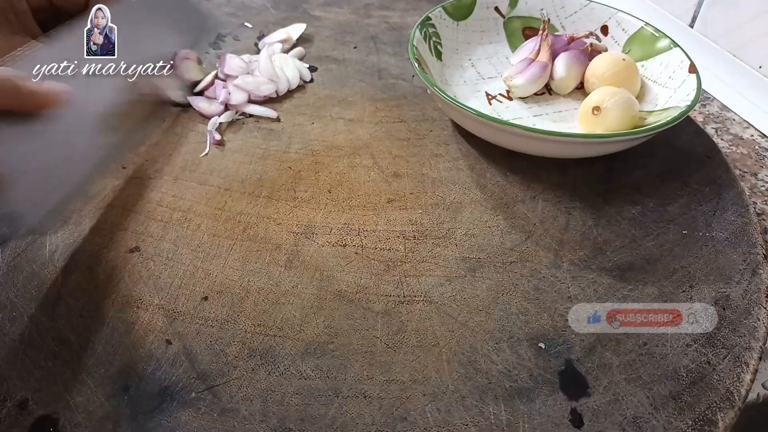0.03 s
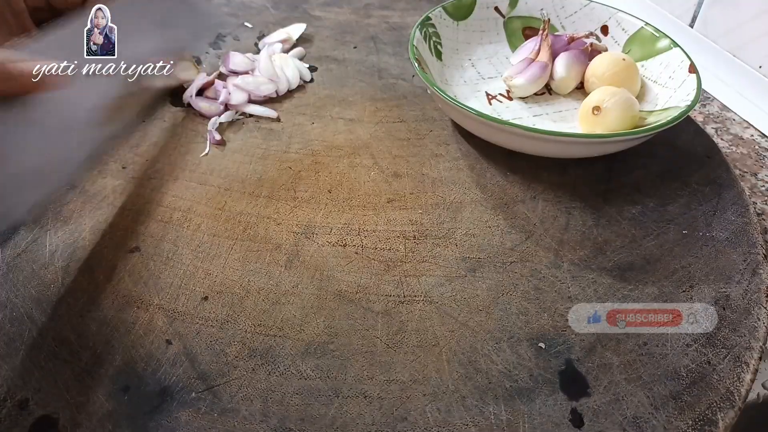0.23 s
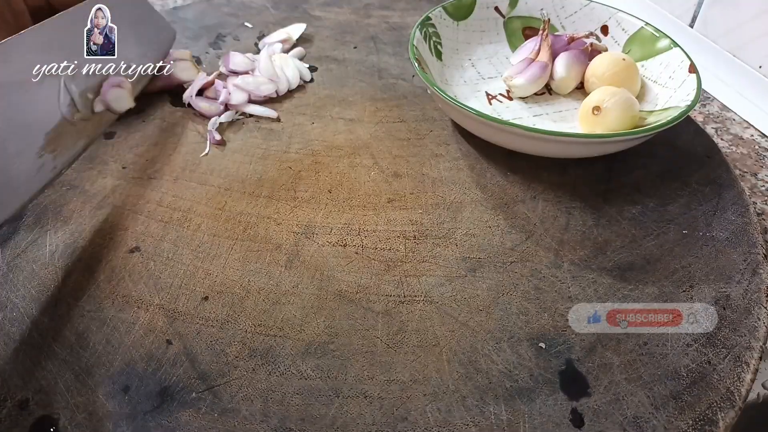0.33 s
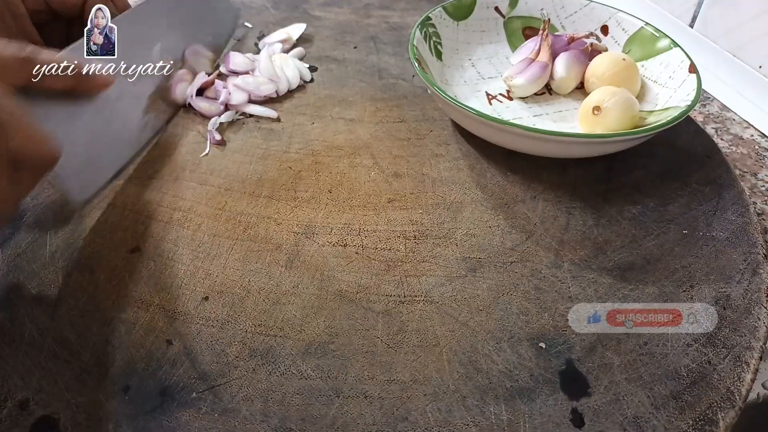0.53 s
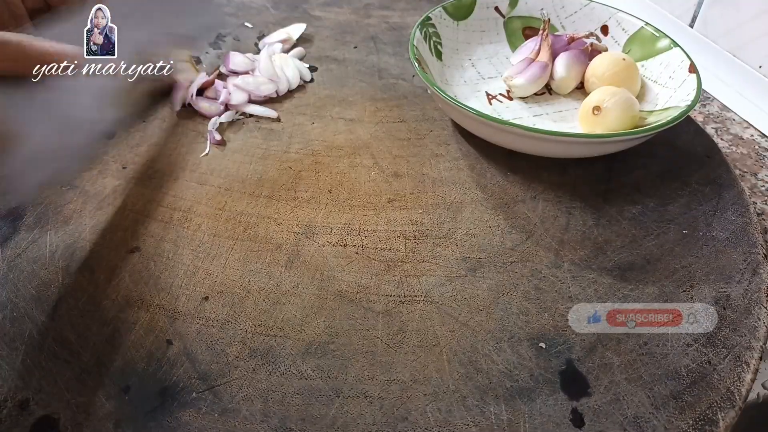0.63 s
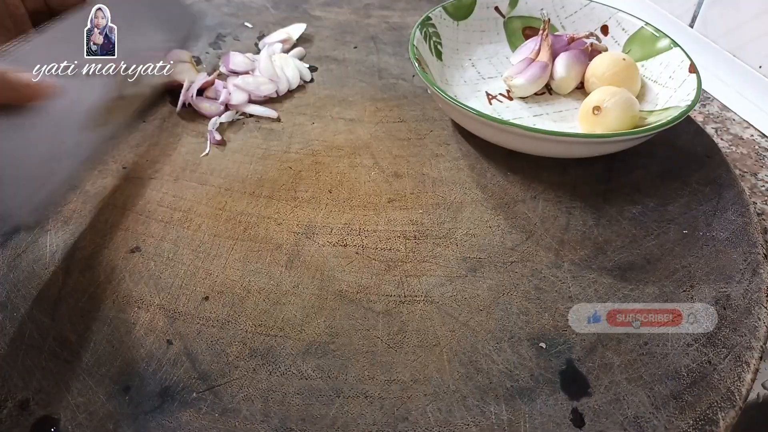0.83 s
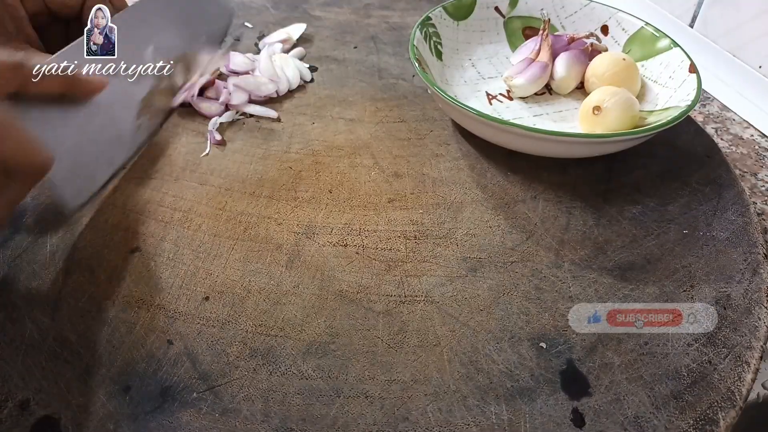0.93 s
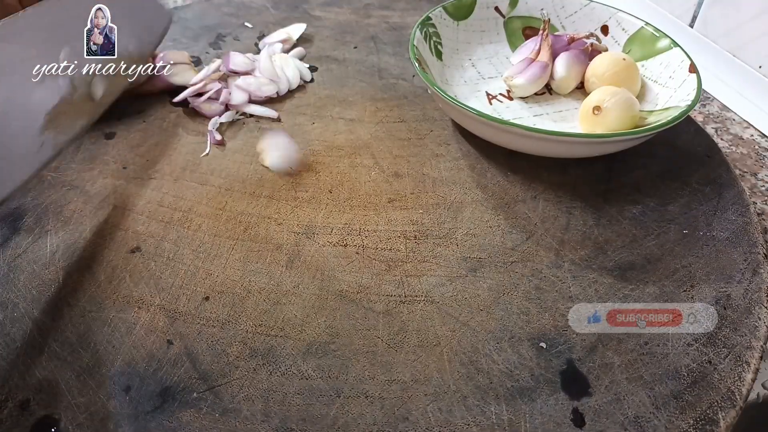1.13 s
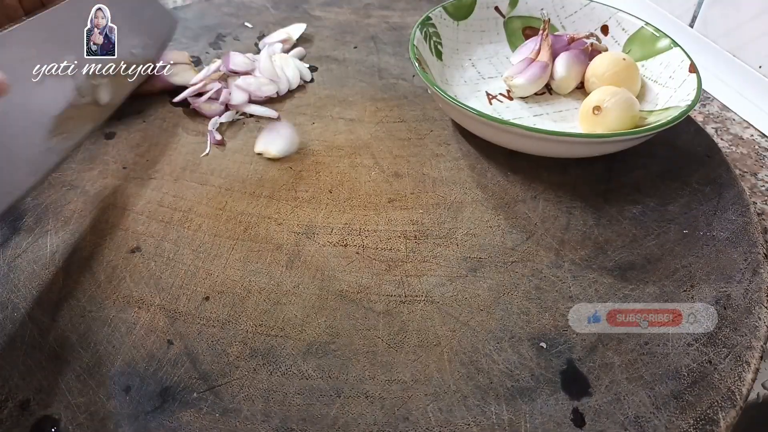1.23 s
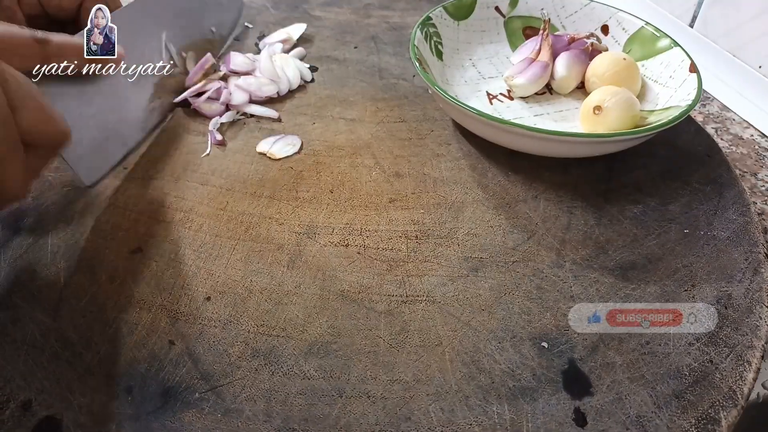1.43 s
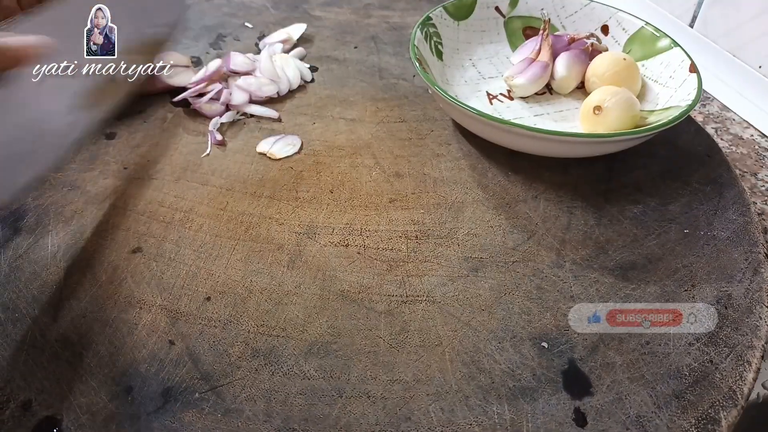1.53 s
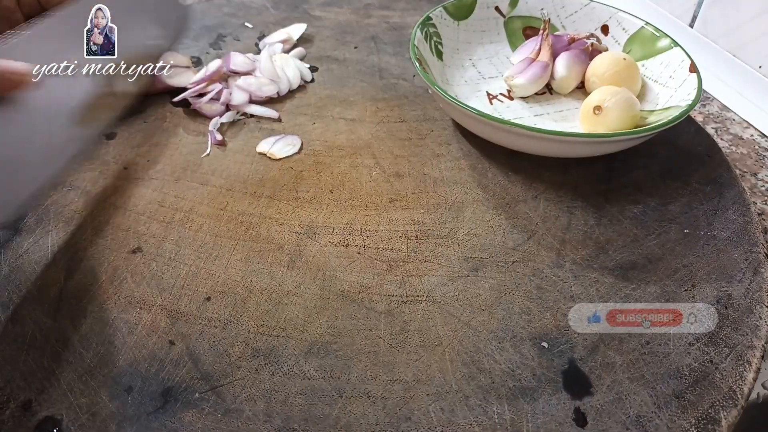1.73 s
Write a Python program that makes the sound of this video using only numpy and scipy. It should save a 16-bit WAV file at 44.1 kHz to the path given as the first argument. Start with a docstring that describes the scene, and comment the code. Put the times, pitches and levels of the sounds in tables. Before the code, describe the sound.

Four evenly paced cleaver chops cut through garlic and land on a wooden board, growing duller toward the end. Between them the steel blade tinks faintly and unsticks with tiny wet ticks, close by in a quiet, small kitchen.

```python
"""Cleaver on a chopping block

A steel cleaver slices cloves on a thick wooden block in a small kitchen, four strokes. The blade
hisses into the clove, crunches through and knocks on the wood. Between strokes it unsticks with
a wet tick and tinks faintly as it is set up again. Near walls and the room answer."""
import sys
import numpy as np
from scipy import signal
from scipy.fft import rfft, irfft, next_fast_len
from scipy.io import wavfile
from scipy.ndimage import map_coordinates

SR = 44100
rng = np.random.default_rng(int(sys.argv[2]) if len(sys.argv) > 2 else 0)


def wrap_up_sound(samples):
    """Save the sound to the file named by the first command line argument, as 16-bit audio."""
    columns = np.atleast_2d(samples).T
    # keep every value between -1 and 1, then stretch to whole-number steps
    tamed = np.clip(columns, -1, 1)
    steps = np.round(tamed * 32767).astype(np.int16)
    wavfile.write(sys.argv[1], SR, steps)


N = 79380

# room tone spectrum: (frequency [Hz], level [dB])
ROOM_TONE = [(25, -1), (60, -4), (150, -10.5), (400, -18), (1000, -22), (3500, -32.5), (8000, -37.5),
             (15500, -34)]
# early reflections off the near walls: (delay [s], level [dB])
WALL_ECHOES = [(.0061, -6.5), (0.0165, -17.5)]
# EQ on those reflections: (frequency [Hz], gain [dB])
WALL_EQ = [(200, -4.5), (900, -0.5), (1600, 5.5), (3000, -4.5), (10000, -2.5)]
# reverb decay: (frequency [Hz], T60 [s])
REVERB_DECAY = [(150, 0.25), (400, 0.2), (750, 0.2), (1050, 0.28), (1700, .24), (3500, 0.21), (7000, 0.18),
                (14000, .21)]
# EQ on the reverb send: (frequency [Hz], gain [dB])
REVERB_EQ = [(150, -15), (450, -7.5), (750, -11.5), (1000, -11), (1600, -6.5), (3000, -9), (7000, -7.5),
             (14000, -5.5)]
# the thud that block and table radiate sideways: (frequency [Hz], level [dB])
THUD_SPECTRUM = [(40, -27), (130, -26), (280, -11.5), (390, -20), (500, -4), (880, 0.5), (1150, -11.5),
                 (1270, -2.5), (1450, -4), (1750, -1), (2200, -10), (3300, -20.5), (5000, -32),
                 (16000, -48.5)]
# the blade is touched, lifted and set up again:
# (time [s], level [dB], scrape length [s], ring level [dB], high note level [dB], low-pass [Hz])
BLADE_TOUCHES = [(0.0, -50, 0.0044, -2.5, -27, 12000), (0.743, -47.5, 0.0063, 2, -21, 3960),
                 (0.7976, -39, 0.0047, -0.5, -3, 14130), (1.163, -47, 0.0059, -6, -11.5, 9300),
                 (1.2337, -47.5, 0.0079, -1.5, -3, 10000), (1.605, -51.5, 0.0091, 0.5, -17.5, 14300),
                 (1.6922, -44.5, 0.011, -3.5, 14, 15400)]
# modes of the steel blade: (frequency [Hz], level [dB])
STEEL_MODES = [(1020, -9.5), (2540, -5.5), (3400, -1.5), (3520, 3), (3930, -2), (4510, -6), (6050, -8),
               (6850, -10.5), (7350, -8.5), (11020, -51), (12400, -29), (12950, -25), (14700, -5)]
# the blade's scrape: (frequency [Hz], level [dB])
SCRAPE_SPECTRUM = [(300, -16.5), (1900, -24), (3500, 5.5), (5200, -9), (7300, 0.5), (9000, -15),
                   (12500, -9), (16000, -23)]
# skin splits or the blade unsticks: (time [s], level [dB], length [s], centre [Hz])
WET_TICKS = [(0.157, -56.5, 0.0027, 10000), (0.737, -48, 0.0066, 2620), (1.143, -54, 0.0091, 2690),
             (1.155, -44.5, 0.0064, 2310), (1.489, -38.5, 0.003, 4190)]
# the edge sliding into the flesh: (frequency [Hz], level [dB])
HISS_SPECTRUM = [(300, -12.5), (1800, -21), (3200, 1), (4800, -6.5), (6700, 0), (9000, -3), (14000, -11),
                 (16000, -14)]
# the clove giving way: (frequency [Hz], level [dB])
CRUNCH_SPECTRUM = [(300, -6.5), (1500, 8.5), (3300, 4.5), (4800, -10), (6700, 0), (8500, -13),
                   (12000, -16.5), (16000, -25)]
# modes of the wooden block: (frequency [Hz], level [dB], T60 [s])
BLOCK_MODES = [(183, -42.5, 0.3), (318.6, -13.5, 0.035), (295, -48.5, 0.27), (455.2, -21, 0.056),
               (625.3, -4, 0.034), (599.2, -25.5, .23), (773, -12, 0.062), (956, 3, .021),
               (1050.5, -3.5, .027), (1547, -3, .02), (2116, -17, 0.02), (2662, -14, 0.023),
               (3340, -10.5, 0.021)]
# the cleaver strokes: (time [s], knock level [dB], low-pass [Hz], crunch level [dB],
# crunch length [s], hiss lead [s], hiss level [dB])
STROKES = [(0.2055, -5, 2300, -29, 0.0022, 0.095, -62.5), (0.597, -5, 2100, -32, 0.0061, 0.078, -68.5),
           (1.0171, -7, 1700, -40.5, 0.0098, 0.08, -62), (1.4836, -12, 1150, -39, 0.01, .115, -62)]

FIRST_TOUCH_S, FIRST_TOUCH_DB = 0.0015, -15  # the edge breaks through the clove just before the wood
PRESS_S, PRESS_DB = 0.0019, -34  # the push through the clove reaches the block earlier still
KNOCK_ATTACK_S = 0.00043


def amp(db):
    """Decibels to gain."""
    return 10 ** (np.asarray(db) / 20)


def along(points, hz):
    """Read a curve of (frequency, value) points on a log frequency axis."""
    freqs, values = np.transpose(points)
    return np.interp(np.log(hz + 1), np.log(freqs + 1), values)


def since(s):
    """Seconds since time s, for every sample."""
    return np.arange(N) / SR - s


def filtered(x, response):
    """Filter x with a complex frequency response."""
    size = next_fast_len(N + SR // 2)
    return irfft(rfft(x, size) * response(np.fft.rfftfreq(size, 1 / SR)), size)[:N]


def delay(hz, s):
    """The response of a delay of s seconds."""
    return np.exp(-2j * np.pi * hz * s)


def low_pass(hz, corner):
    """The response of a two-pole low-pass."""
    return 1 / (1 + 1j * np.sqrt(2) * hz / corner - (hz / corner) ** 2)


def radiation(hz, corner_hz=248):
    """A two-pole high-pass: the block sends out little deep bass."""
    return -(hz / corner_hz) ** 2 * low_pass(hz, corner_hz)


def noise(spectrum, grain_db=0, clump_db=2.0):
    """Coloured noise of rms 1; grain_db breaks it into tiny uneven grains that come in clumps."""
    grain, clump = 16, 130  # samples
    grains = np.repeat(rng.standard_normal(N // grain + 1), grain)[:N]
    clumps = map_coordinates(rng.standard_normal(N // clump + 4), [np.arange(N) / clump])
    texture = amp(grain_db * grains + clump_db * clumps * (grain_db > 0))
    coloured = filtered(rng.standard_normal(N) * texture, lambda hz: amp(along(spectrum, hz)))
    return coloured / np.sqrt(np.mean(coloured ** 2) + 1e-20)


def burst(s, rise, hold, t60):
    """Envelope: a linear rise from time s, and an exponential release from s + hold."""
    t = since(s)
    return np.clip(t / rise, 0, 1) * amp(-60 * np.maximum(t - hold, 0) / t60)


def ring(s, modes, attack, scatter_db=0.8):
    """Damped modes struck at time s, their balance a little different on every hit."""
    t = since(s)
    ringing = (t > 0) & (t < 0.5)
    out, t = np.zeros(N), t[ringing]
    onset = 1 - np.exp(-t / attack)
    for hz, db, t60 in modes:
        decay = amp(db + scatter_db * rng.standard_normal() - 60 * t / t60)
        out[ringing] += onset * decay * np.sin(2 * np.pi * hz * t)
    return out


def room_tone():
    """A very quiet, bass-heavy bed of steady noise."""
    return amp(-75) * noise(ROOM_TONE)


def kitchen(direct, indirect):
    """Direct sound, slaps off the near walls and a short diffuse tail; indirect feeds only the tail."""
    predelay_s, build_s = 0.011, 0.01
    freqs, t, bands = signal.stft(rng.standard_normal(SR // 2), SR, nperseg=256)
    decay = amp(-60 * t / along(REVERB_DECAY, freqs)[:, None])
    tail = signal.istft(bands * decay, SR, nperseg=256)[1]
    tail *= np.clip((np.arange(len(tail)) / SR - predelay_s) / build_s, 0, 1)
    send = indirect + filtered(direct, lambda hz: amp(along(REVERB_EQ, hz)))
    slaps = lambda hz: sum(amp(db) * delay(hz, s) for s, db in WALL_ECHOES)
    early = filtered(direct, lambda hz: amp(along(WALL_EQ, hz)) * slaps(hz))
    return direct + early + signal.fftconvolve(send, tail / np.linalg.norm(tail))[:N]


def sideways_thuds(boost_db=20):
    """Each blow sends a broad thud sideways from block and table, heard only through the room."""
    out = np.zeros(N)
    for s, db, dull_hz, *_ in STROKES:
        blow = signal.unit_impulse(N, round(s * SR))
        thud = filtered(blow, lambda hz: amp(along(THUD_SPECTRUM, hz)) * low_pass(hz, dull_hz))
        out += amp(db + boost_db) * thud
    return out


def hand_bump(dull_hz=322.7):
    """A soft bump of the hand rings the low notes of the block before the first stroke."""
    wood = ring(0.0895, BLOCK_MODES, KNOCK_ATTACK_S)
    return amp(-40.5) * filtered(wood, lambda hz: low_pass(hz, dull_hz) * radiation(hz))


def blade_tinks():
    """A brief scrape sets the steel ringing; the hand damps it quickly."""
    steel_t60, high_hz, high_t60 = 0.06, 8262, 0.055
    out = np.zeros(N)
    for s, db, length, ring_db, high_db, dull_hz in BLADE_TOUCHES:
        modes = [(hz, level, steel_t60) for hz, level in STEEL_MODES] + [(high_hz, high_db, high_t60)]
        scrape = burst(s, rise=0.0033, hold=length, t60=0.036) * noise(SCRAPE_SPECTRUM, grain_db=1.5)
        steel = amp(ring_db) * ring(s, modes, attack=length / 2)
        out += amp(db) * filtered(steel + scrape, lambda hz: low_pass(hz, dull_hz))
    return out


def wet_ticks():
    """Short wet crackles of splitting skin and of the blade lifting out of the cut."""
    out = np.zeros(N)
    for s, db, length, hz in WET_TICKS:
        band = [(hz / 4, -32), (hz / 1.5, -14), (hz, 0), (hz * 1.5, -11), (hz * 5, -35)]
        envelope = burst(s, rise=0.002, hold=length, t60=0.025)
        out += amp(db) * envelope * noise(band, grain_db=4)
    return out


def clove_cuts():
    """The edge hisses ever louder as it sinks into the flesh, then crunches through."""
    hiss_swell_db, crunch_rise_db_per_s, crunch_t60 = 6.5, 3000, 0.013
    out = np.zeros(N)
    for s, _, _, crunch_db, length, lead, hiss_db in STROKES:
        swell_db = hiss_swell_db * np.clip(since(s) / lead, -1, 0)
        envelope = burst(s - lead, rise=0.045, hold=lead, t60=0.13)
        out += amp(hiss_db + swell_db) * envelope * noise(HISS_SPECTRUM, grain_db=3)
        t = since(s - FIRST_TOUCH_S)
        attack_db = crunch_rise_db_per_s * np.minimum(t, 0)
        release_db = -60 * np.maximum(t - length, 0) / crunch_t60
        out += amp(crunch_db + attack_db + release_db) * noise(CRUNCH_SPECTRUM, grain_db=2.5)
    return out


def contact(hz):
    """The response of three quick pushes: press, first touch, then the full blow."""
    press = amp(PRESS_DB) * delay(hz, -PRESS_S)
    touch = amp(FIRST_TOUCH_DB) * delay(hz, -FIRST_TOUCH_S)
    return press + touch + 1


def block_knocks():
    """The cleaver lands and rings the block; a cushioned blow is duller. The blade sings on faintly."""
    blade_hz, blade_db, blade_t60 = 2743, -53.5, 0.47
    out = np.zeros(N)
    for s, db, dull_hz, *_ in STROKES:
        wood = ring(s, BLOCK_MODES, KNOCK_ATTACK_S)
        out += amp(db) * filtered(wood, lambda hz: contact(hz) * low_pass(hz, dull_hz) * radiation(hz))
        out += ring(s, [(blade_hz, blade_db, blade_t60)], KNOCK_ATTACK_S)
    return out


def scene():
    """The mono mix: all the knife work in the kitchen, over room tone."""
    knife_work = block_knocks() + clove_cuts() + wet_ticks() + blade_tinks() + hand_bump()
    return (kitchen(knife_work, sideways_thuds()) + room_tone())[None]


def record(dry):
    """A soft clip rounds the highest peaks, then a brick-wall low-pass trims the very top."""
    ceiling, top_hz = 0.68, 15850
    rounded = dry[0] / (1 + (dry[0] / ceiling) ** 4) ** (1 / 4)
    return filtered(rounded, lambda hz: hz < top_hz)[None]


dry = scene()
out = record(dry)
wrap_up_sound(out)
```